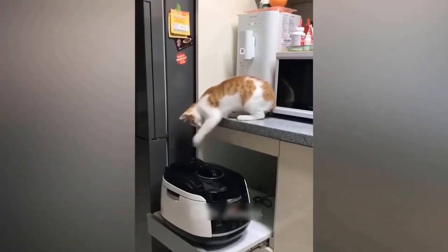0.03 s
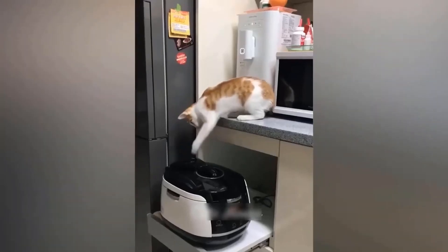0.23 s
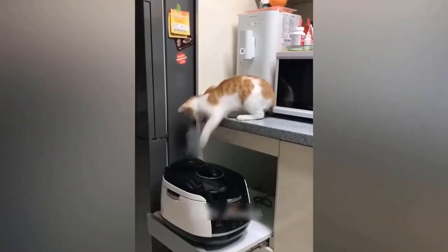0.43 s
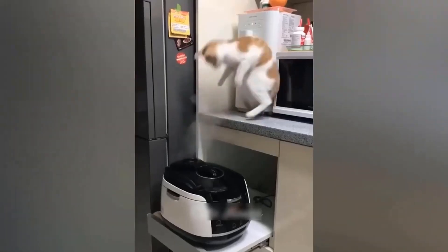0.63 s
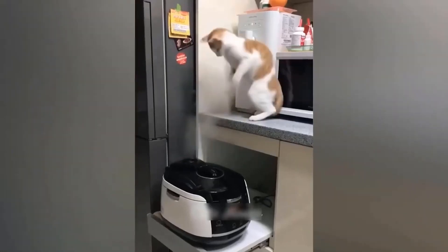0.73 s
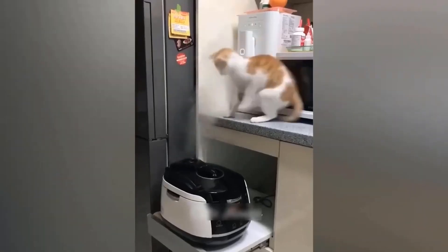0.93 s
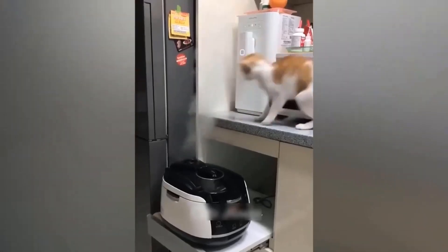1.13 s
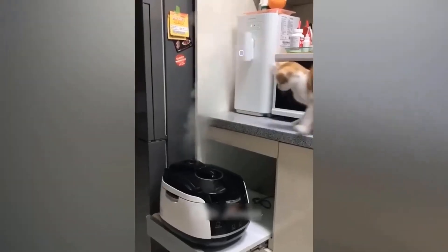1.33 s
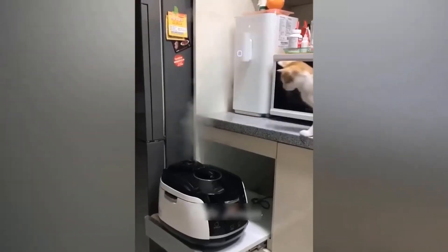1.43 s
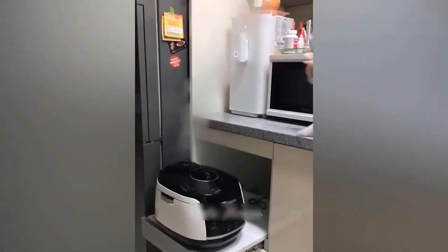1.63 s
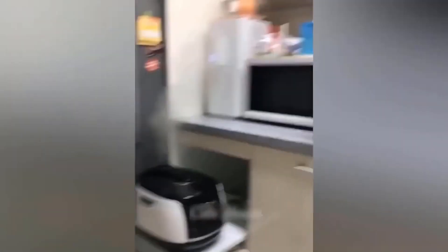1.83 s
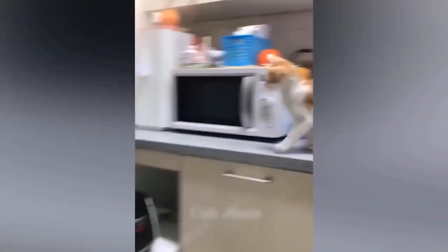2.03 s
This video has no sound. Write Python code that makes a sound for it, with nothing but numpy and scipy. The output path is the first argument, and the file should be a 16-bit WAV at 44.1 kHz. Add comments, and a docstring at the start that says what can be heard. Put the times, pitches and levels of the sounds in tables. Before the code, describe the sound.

A steam jet bursts from a pressure cooker valve and hisses loudly and steadily in a kitchen.

```python
"""Steam jet of a pressure cooker on a kitchen floor stand: fluttering coloured noise, with narrow peaks
and notches from the room. Before it come a small first puff and a valve click; the valve pops open,
clicks again and the pot rings on: short gusts of coloured noise. A cabinet nearby returns one echo ahead
of a sparse room tail. A low rumble, hands on the microphone or paws on the counter, comes and goes as
wandering resonant noise. Behind lies quiet kitchen air, noise with a faint hum; one microphone feeds
both sides."""
import sys
import numpy as np
from scipy import signal
from scipy.fft import rfft, irfft
from scipy.io import wavfile
from scipy.ndimage import uniform_filter1d

SR = 44100
rng = np.random.default_rng(int(sys.argv[2]) if len(sys.argv) > 2 else 0)


def wav_record(signal):
    """Record a signal, one row per channel, as 16-bit PCM in the file named by sys.argv[1]."""
    frames = np.transpose(np.atleast_2d(signal))
    bounded = np.clip(frames, -1, 1)
    # unit amplitude maps onto the largest positive 16-bit level
    quanta = np.round(bounded * 32767).astype(np.int16)
    wavfile.write(sys.argv[1], SR, quanta)


def convert_level_to_amplitude(level_db):
    """Map a level in decibels to its linear amplitude factor."""
    exponent = np.asarray(level_db, float) / 20
    return 10 ** exponent


N = 91110


def evened(x):
    """Scales a signal to rms 1."""
    return x / np.sqrt(np.mean(x ** 2) + 1e-20)


def colour(points, hz):
    """Reads a spectrum table in dB along log frequency, silent outside its ends."""
    f, db = np.transpose(points)
    return np.interp(np.log(hz + 1), np.log(f), db, left=-90, right=-90)


def shaped(x, points, peaks=()):
    """Colours a signal by a spectrum and optional narrow peaks or notches, to rms 1."""
    hz = np.fft.rfftfreq(N, 1 / SR)
    db = colour(points, hz)
    for centre, width, boost_db in peaks:
        db = db + boost_db / (1 + (2 * (hz - centre) / width) ** 2)
    return evened(irfft(rfft(x) * convert_level_to_amplitude(db), N))


def wobble(seconds):
    """Random fluctuation, noise smoothed twice over the given grain length, rms 1."""
    width = max(int(seconds * SR), 1)
    once = uniform_filter1d(rng.standard_normal(N), width)
    return evened(uniform_filter1d(once, width))


def curve(table, column):
    """Gain over time from a dB column, at -120 dB before the first row."""
    rows = np.array(table)
    return convert_level_to_amplitude(np.interp(np.arange(N) / SR, rows[:, 0], rows[:, column], left=-120))


def jet():
    """Steam turbulence: flutter and drifting patches, with narrow peaks and notches from the room."""
    # Steam flow: t/s, level below the treble/dB, level of the treble/dB
    flow = [(.655, -70, -66), (.666, -56, -48), (.674, -48, -43), (.679, -32, -36), (.686, -24, -28),
            (.7, -21.5, -23), (.76, -21.5, -23), (.9, -23, -22.5), (1.1, -22.5, -23.5), (1.3, -22.5, -22.5),
            (1.55, -23.5, -24), (1.62, -22, -23), (1.8, -23, -23), (2.06, -23, -23)]
    # Spectrum of the hiss: f/Hz, relative level/dB per Hz
    hiss_colour = [(180, -48), (300, -26), (450, -25), (603, -23), (750, -23), (900, -21), (1080, -18),
                   (1300, -18), (1930, -10), (2200, -11), (2440, -15), (2540, -8), (2900, -2.5), (3300, -2),
                   (3600, -4), (3750, -7), (4000, -9), (4400, -11), (4700, -9), (5150, -12), (5300, -8),
                   (5700, -8), (5850, -2.5), (6480, -1.5), (6560, -12), (6830, -12), (6900, -8), (8360, -8),
                   (10200, -14), (11900, -15), (15000, -12), (15600, -11), (16000, -14)]
    # Narrow peaks and notches from reflections in the room: f/Hz, width/Hz, boost/dB
    room_peaks = [(2040, 30, -8), (2170, 50, 4), (2255, 25, -8), (2362, 30, 8), (2537, 25, 6),
                  (2730, 40, 3), (2891, 20, 9.5), (3130, 50, 5), (3190, 25, -7), (3348, 20, 7),
                  (3441, 20, 4), (3492, 20, 4), (3560, 25, -7), (3609, 20, 8), (3665, 25, -7),
                  (4680, 60, 3), (5260, 50, 4), (5455, 20, 5), (5790, 20, 3), (7883, 30, 6), (8070, 20, 6)]
    flutter_db, flutter_s = 1.7, .0003
    swell_db, swell_s = .3, .03
    patch_db = .6
    treble_hz = 7000  # the treble starts here

    flutter = flutter_db * wobble(flutter_s)
    swell = swell_db * wobble(swell_s)
    eddies = rng.standard_normal(N) * convert_level_to_amplitude(flutter + swell)

    # Patches: level drift smoothed over 8 bins in frequency and 16 frames in time
    z = signal.stft(eddies, nperseg=512, noverlap=384)[2]
    patches = uniform_filter1d(rng.standard_normal(z.shape), 8, 0)
    patches = evened(uniform_filter1d(patches, 16, 1))
    eddies = signal.istft(z * convert_level_to_amplitude(patch_db * patches), nperseg=512, noverlap=384)[1][:N]

    hiss = shaped(eddies, hiss_colour, room_peaks)
    highpass = signal.butter(4, treble_hz, "high", fs=SR, output="sos")
    treble = signal.sosfiltfilt(highpass, hiss)
    return (hiss - treble) * curve(flow, column=1) + treble * curve(flow, column=2)


def blast(points, start, rise, peak_db, t60, peaks=()):
    """A gust of coloured noise that swells over rise/s, then falls 60 dB in t60/s, with spatter in it."""
    spatter_db, spatter_s = 1.5, .002
    t = np.arange(N) / SR - start
    swell = np.clip(t / rise, 0, 1) ** 2
    decay = convert_level_to_amplitude(peak_db - 60 * np.maximum(t - rise, 0) / t60)
    spatter = convert_level_to_amplitude(spatter_db * wobble(spatter_s))
    return swell * decay * spatter * shaped(rng.standard_normal(N), points, peaks)


def pop():
    """The valve pops open in a strong gust, and noise in the pot's resonances rings on."""
    # Spectrum of the pop: f/Hz, relative level/dB per Hz
    pop_colour = [(60, -30), (120, -13), (250, -7), (450, -3), (650, -5), (900, 0), (1500, -1), (2200, -4),
                  (3000, -15), (6000, -40)]
    # Ring of the pot: t/s, rise/s, peak level/dB, t60/s
    pot_ring = (.68, .05, -32, .5)
    # Resonances of the pot: f/Hz, width/Hz, boost/dB
    pot_modes = [(220, 30, 8), (335, 30, 12), (455, 25, 18), (810, 30, 14), (1050, 30, 17), (1250, 40, 8)]
    burst = blast(pop_colour, start=.676, rise=.027, peak_db=-20.5, t60=.14)
    return burst + blast(pop_colour, *pot_ring, peaks=pot_modes)


def puff():
    """The small first puff: a bright gust, joined by one with more body and a quicker rise."""
    # Spectrum of the bright gust: f/Hz, relative level/dB per Hz
    puff_colour = [(1500, -30), (2500, -6), (3500, -2), (5000, 0), (6000, -4), (6700, -16), (10000, -20),
                   (14000, -16), (16000, -20)]
    # Spectrum of the body: f/Hz, relative level/dB per Hz
    body_colour = [(150, -25), (320, -2), (500, -3), (716, -10), (905, -4), (1600, 0), (2300, -9),
                   (3500, -8), (5000, -25)]
    bright = blast(puff_colour, start=.505, rise=.024, peak_db=-46, t60=.26)
    return bright + blast(body_colour, start=.526, rise=.008, peak_db=-39.5, t60=.26)


def valve():
    """The valve pin ticks against its seat: very short bursts of coloured noise."""
    # Ticks of the pin: t/s, level/dB
    ticks = [(.6468, -40), (.6765, -33)]
    # Spectrum of a tick: f/Hz, relative level/dB per Hz
    pin_colour = [(2000, -30), (2700, -2), (3200, 0), (4000, -3), (5000, -14), (6200, -7), (6700, -24),
                  (12000, -24), (15500, -30)]
    return sum(blast(pin_colour, start, rise=.0015, peak_db=db, t60=.022) for start, db in ticks)


def kitchen(x):
    """Adds to the direct sound one cabinet echo and a sparse decaying room tail."""
    echo_s, echo_db = .00553, -12  # a detour of about 1.9 m; level against the direct sound
    room_db, room_t60_s, room_start_s = -10, .2, .008  # whole tail against the direct sound
    reflections_per_s = 3000  # average density
    t = np.arange(SR // 2) / SR
    arrivals = (rng.random(len(t)) < reflections_per_s / SR) * (t > room_start_s)
    tail = rng.standard_normal(len(t)) * arrivals * convert_level_to_amplitude(-60 * t / room_t60_s)

    direct = np.sinc(t * SR)
    echo = convert_level_to_amplitude(echo_db) * np.sinc((t - echo_s) * SR)
    taps = convert_level_to_amplitude(room_db) * tail / np.linalg.norm(tail) + direct + echo
    return signal.fftconvolve(x, taps / np.linalg.norm(taps))[:N]


def rumble():
    """Handling or paws: noise through a wandering low resonance, with a broader part above it."""
    # Course of the rumble: t/s, low part level/dB, upper part level/dB, low part centre f/Hz
    course = [(.72, -56, -56, 120), (.88, -60, -58, 120), (.96, -44, -49, 105), (1.03, -53, -48, 110),
              (1.058, -40, -43, 105), (1.108, -50, -46, 110), (1.15, -59, -58, 100), (1.19, -51, -64, 90),
              (1.25, -51, -52, 120), (1.32, -43, -62, 85), (1.364, -53, -62, 80), (1.412, -43, -54, 100),
              (1.51, -45, -58, 85), (1.544, -48, -52, 100), (1.565, -39, -52, 110), (1.608, -38, -46, 105),
              (1.694, -49, -60, 90), (1.72, -43, -58, 85), (1.79, -39, -55, 72), (1.83, -46, -62, 68),
              (1.88, -64, -62, 80), (2.06, -64, -62, 90)]
    # Spectrum of the upper part: f/Hz, relative level/dB per Hz
    upper_colour = [(130, -20), (170, -2), (240, 0), (350, -3), (480, -10), (600, -25)]
    pole_width_hz, low_cut_hz = 55, 62

    # Noise is turned down to 0 Hz, smoothed by two equal poles and turned back up
    rows = np.array(course)
    centre_hz = np.interp(np.arange(N) / SR, rows[:, 0], rows[:, 3])
    turn = np.exp(2j * np.pi * np.cumsum(centre_hz) / SR)
    r = np.exp(-np.pi * pole_width_hz / SR)
    slow = signal.lfilter([1], np.poly([r, r]), rng.standard_normal(N) / turn)

    low = evened((slow * turn).real) * curve(course, column=1)
    upper = shaped(rng.standard_normal(N), upper_colour) * curve(course, column=2)
    highpass = signal.butter(4, low_cut_hz, "high", fs=SR, output="sos")
    return signal.sosfilt(highpass, low + upper)


def air():
    """Kitchen background: gently unsteady coloured noise and faint wavering appliance hum."""
    # Spectrum of the air: f/Hz, relative level/dB per Hz
    air_colour = [(15, -35), (30, -14), (55, -6), (120, -2), (250, -3), (370, -6), (450, -11), (677, -16),
                  (988, -13), (1400, -21), (2400, -25), (2600, -19), (3300, -21), (4500, -24), (6400, -30),
                  (6600, -38), (9000, -39), (14000, -38), (15000, -42), (16000, -56)]
    # Appliance hum: f/Hz, rms level/dB
    hum_tones = [(60, -68), (358, -73)]
    air_db = -56  # rms, about which the level wobbles
    t = np.arange(N) / SR
    hum = np.zeros(N)
    for hz, db in hum_tones:
        tone = np.sqrt(2) * np.sin(2 * np.pi * (hz * t + rng.random()))
        hum += convert_level_to_amplitude(db + 2.5 * wobble(.05)) * tone
    level = convert_level_to_amplitude(air_db + .8 * wobble(.02))
    return level * shaped(rng.standard_normal(N), air_colour) + hum


def scene():
    """The cooker in its room, the rumble and the air at one microphone, alike on both sides."""
    cooker = jet() + pop() + puff() + valve()
    return np.tile(kitchen(cooker) + rumble() + air(), (2, 1))


def band_limit(x):
    """A steep low-pass at the top of the band."""
    return signal.sosfilt(signal.butter(12, 16870, fs=SR, output="sos"), x)


def record(dry):
    """Limits the treble of the microphone signal with a steep lowpass and finishes the mix."""
    edge_hz = 15720
    lowpass = signal.firwin(1023, edge_hz, window=("kaiser", 10), fs=SR)
    mix = signal.oaconvolve(dry, lowpass[None], "same")
    return band_limit(mix)


dry = scene()
out = record(dry)
wav_record(out)
```